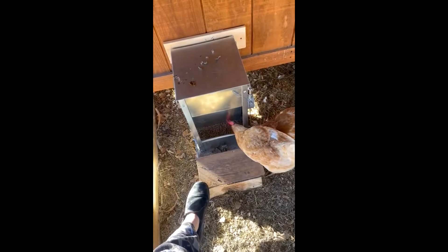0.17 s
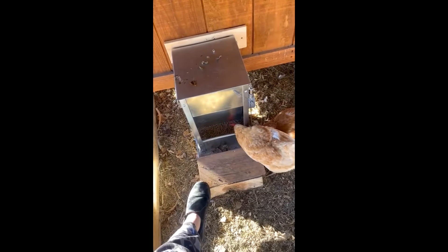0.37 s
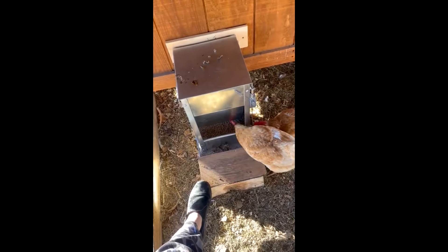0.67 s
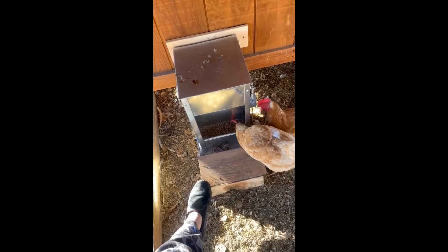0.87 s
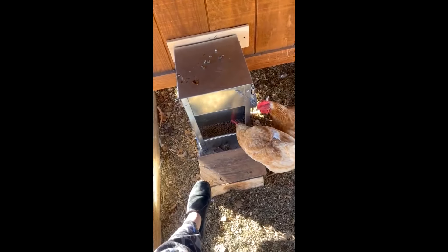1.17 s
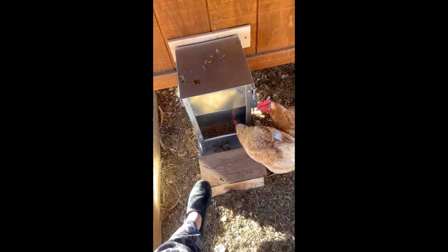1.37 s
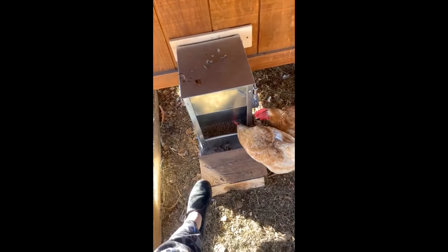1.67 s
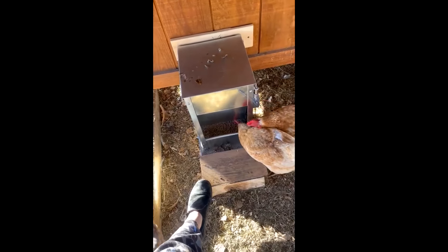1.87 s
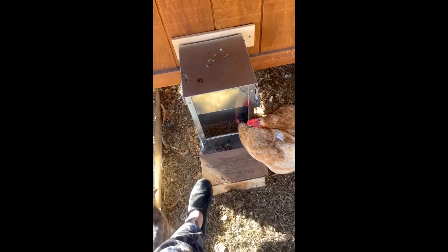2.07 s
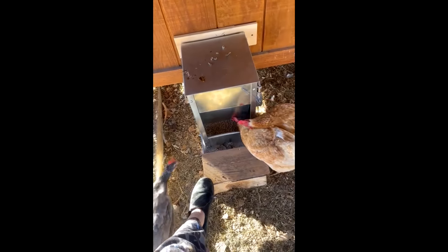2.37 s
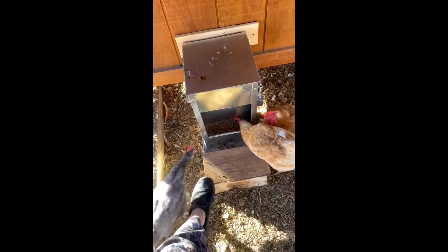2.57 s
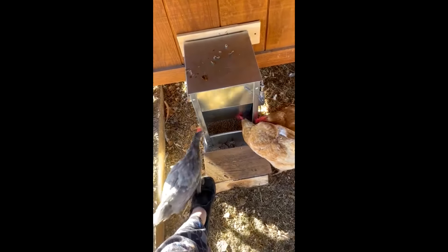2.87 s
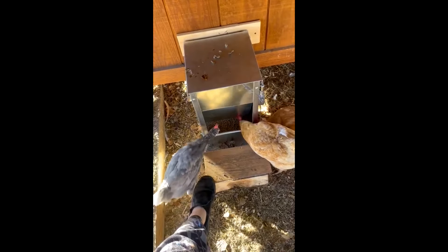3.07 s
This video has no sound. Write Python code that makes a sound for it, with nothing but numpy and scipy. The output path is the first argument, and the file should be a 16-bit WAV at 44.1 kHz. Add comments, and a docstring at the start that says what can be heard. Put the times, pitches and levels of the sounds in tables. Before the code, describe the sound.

Hens peck a metal feeder with sharp bright ticks, raking dry feed and clucking softly

```python
"""Hens at a metal feeder

Beaks tick on grain and metal (short pings over noise clicks) and rake through dry feed (dense random grains).
Hens cluck softly (harmonics through a throat resonance, with breath and low noise for body); one whines (a sine).
Feed and litter rustle and the flock murmurs over a low rumble with soft knocks (coloured noise on level curves).
A phone hears it in stereo: two microphone ports with a phase difference and short yard reflections.
"""
import sys
import numpy as np
from scipy import signal
from scipy.fft import rfft, irfft
from scipy.io import wavfile
from scipy.ndimage import uniform_filter1d

SR = 44100
rng = np.random.default_rng(int(sys.argv[2]) if len(sys.argv) > 2 else 0)


def to_wav(sig):
    """Store sig (one row per channel, or 1-D mono) as 16-bit WAV at the path in sys.argv[1].

    Samples outside -1..1 are clipped; the rate is SR.
    """
    pcm = np.clip(np.atleast_2d(sig), -1, 1) * 32767
    pcm = np.round(pcm).astype(np.int16)
    wavfile.write(sys.argv[1], SR, pcm.T)  # frames by channels


N = 141120  # length [samples]


def undb(db):
    """Gain of a level in dB."""
    return 10 ** (np.asarray(db, float) / 20)


def unit(x):
    """Scale to rms 1."""
    return x / np.sqrt(np.mean(x ** 2))


def curve(table, column=1):
    """A table column joined by straight lines in time."""
    points = np.array(table, float)
    return np.interp(np.arange(N) / SR, points[:, 0], points[:, column])


def bins():
    """Frequencies of the full-length spectrum [Hz]."""
    return np.arange(N // 2 + 1) * SR / N


def colour(x, table):
    """Filter by (frequency, level) points joined over log frequency, dark outside them; rms 1."""
    hz, db = np.array(table, float).T
    log_f = np.log(bins() + 1)  # 1 Hz up, to avoid log(0)
    gain = undb(np.interp(log_f, np.log(hz), db, left=-90, right=-90))
    return unit(irfft(rfft(x) * gain, N))


def band(x, lo_hz, hi_hz):
    """Causal band-pass."""
    sos = signal.butter(2, [lo_hz, min(hi_hz, SR * .45)], "band", fs=SR, output="sos")
    return signal.sosfilt(sos, x)


def walk(rate, size=N):
    """Smooth chance with rms 1: noise averaged twice over 1/rate seconds."""
    k = max(int(SR / rate), 1)
    noise = rng.standard_normal(size + 4 * k)
    smooth = uniform_filter1d(uniform_filter1d(noise, k), k)
    return unit(smooth[2 * k:2 * k + size])


def add(out, start, x):
    """Mix x into out at a time."""
    i = int(start * SR)
    out[i:i + len(x)] += x[:len(out) - i]


def patchy(x, edges_hz, rate, depth_db):
    """Let each band swell and sink on its own."""
    spec, f = rfft(x), bins()
    total = 0
    for lo, hi in zip(edges_hz, edges_hz[1:]):
        part = irfft(spec * ((f >= lo) & (f < hi)), N)
        total = total + part * undb(depth_db * walk(rate))
    return total


# Low rumble with soft low knocks at its peaks: (time [s], level [dB])
RUMBLE_LEVEL = [(0, -60.5), (.25, -52.5), (.45, -58.5), (1.04, -51.5), (1.15, -56), (1.32, -50), (1.5, -57),
                (1.8, -54.5), (2.05, -59), (2.16, -53.5), (2.58, -55), (2.75, -58.5), (2.95, -49.5),
                (3.05, -54.5), (3.2, -58.5)]
# Spectrum of the rumble: (frequency [Hz], relative level [dB per Hz])
RUMBLE_SPECTRUM = [(13, -45), (22, -21), (54, 1.5), (69, 0.5), (140, -6.5), (194, -18), (250, -19.5),
                   (320, -49), (550, -120)]


def rumble():
    """Low rumble: coloured noise with a slow waver; the peaks of its level curve are soft low knocks."""
    noise = colour(rng.standard_normal((3, N)), RUMBLE_SPECTRUM)
    return noise * undb(curve(RUMBLE_LEVEL) + 1.5 * walk(9))


# Murmur of the flock: (time [s], level [dB])
FLOCK_LEVEL = [(0, -61), (.4, -66.5), (.75, -67), (.95, -54), (1.5, -63.5), (1.65, -54.5), (1.71, -60),
               (1.8, -57), (2.05, -67), (2.3, -58), (2.65, -64), (3.2, -65)]
# Spectrum of the murmur: (frequency [Hz], relative level [dB per Hz])
FLOCK_SPECTRUM = [(100, -32), (170, 0), (248, -16.5), (330, -4.5), (446, -16), (780, -4), (1100, -8),
                  (1700, -23), (2210, -25), (3740, -120)]


def flock():
    """Murmur and shuffle of the flock: coloured noise that flickers band by band."""
    noise = colour(rng.standard_normal((3, N)), FLOCK_SPECTRUM)
    flicker = patchy(noise, [0, 280, 450, 700, 1100, SR], 14, 3.0)
    return flicker * undb(curve(FLOCK_LEVEL))


GRAINS_PER_S, GRAIN_SPREAD_DB, BIGGEST_GRAIN_DB = 5000, 3, 5.5
GRAIN_EDGES_HZ = [0, 2000, 2700, 3500, 4300, 5100, 5900, 6800, 7600, 8500, 9300, 10100, SR]


def grains():
    """Dense clicks of very uneven size: one stream heard by both ports, one more for each."""
    chance, size = rng.random((2, 3, N))
    hits = chance < GRAINS_PER_S / SR
    size_db = np.minimum(-GRAIN_SPREAD_DB * np.log(1 - size), BIGGEST_GRAIN_DB)
    return hits * undb(size_db) * rng.standard_normal((3, N))


# Level of the feed and litter rustle: (time [s], level [dB])
RUSTLE_LEVEL = [(0, -62), (.4, -60), (.81, -56), (1.15, -64), (1.75, -63.5), (2.3, -59), (2.85, -62.5),
                (2.96, -65.5), (3.2, -59)]
# Spectrum of the litter: (frequency [Hz], relative level [dB per Hz])
LITTER_SPECTRUM = [(1000, -1.5), (1400, -9.5), (2520, -6.5), (5460, 0), (7100, -11), (9320, -1),
                   (10700, -12.5), (11400, -36)]


def rustle():
    """Feed and litter never quite rest: coloured grains flicker band by band along a level curve."""
    litter = patchy(colour(grains(), LITTER_SPECTRUM), GRAIN_EDGES_HZ, 18.3, 3.6)
    return litter * undb(curve(RUSTLE_LEVEL) + 1.54 * walk(28.4))


BODY_S = 0.056  # time scale; the peak comes at a third of it
# Low, dull noise bodies, mostly under the clucks: (time [s], level [dB], pitch [Hz])
CLUCK_BODIES = [(1.05, -55, 209), (1.25, -53, 233), (1.409, -55, 210), (1.576, -51.5, 269),
                (1.639, -66, 254), (1.75, -54, 400), (1.85, -61, 605), (1.928, -60, 330)]


def cluck_bodies():
    """Low noise gives the clucks body: dull lumps, quick to start and slow to die."""
    out = np.zeros(N)
    u = np.arange(int(3 * BODY_S * SR)) / SR / BODY_S
    env = 8 * u * np.exp(-3 * u)  # peaks near 1
    for start, db, hz in CLUCK_BODIES:
        lump = unit(band(rng.standard_normal(len(u)), 0.45 * hz, 1.54 * hz))
        add(out, start, undb(db) * lump * env)
    return out


# Thin rising whine: (time [s], pitch [Hz], level [dB])
WHINE_GLIDE = [(1.8, 864, -85), (1.86, 915, -71), (2.03, 1066, -59), (2.09, 1117, -70), (2.11, 1120, -89)]


def whine():
    """One hen's thin whine: a sine gliding upward with a wavering level."""
    level = np.sqrt(2) * undb(curve(WHINE_GLIDE, column=2) + 2.0 * walk(36))  # sqrt(2): rms level
    return level * np.sin(2 * np.pi * np.cumsum(curve(WHINE_GLIDE)) / SR)


THROAT_WIDTH = .17  # resonance width in log frequency, narrower above the peak
CLUCK_ATTACK, SAG = 0.38, 0.024  # share of the cluck spent rising; share of the pitch lost along it
CHEST_DB, SKIRT_DB, BREATH_DB = -16, -18.5, 1  # extra fundamental, floor of the overtones, breath
RASP_HZ = 100.5  # rate of the roughness
# Clucks: (time [s], length [s], level [dB], pitch [Hz], throat resonance [Hz], roughness [0-1, clipped])
CLUCK_CALLS = [(0.684, 0.029, -44.5, 288.5, 768, 0.1), (0.826, 0.044, -49, 301.3, 1000, 0.42),
               (0.92, 0.096, -55, 331, 945, 0.58), (1.177, 0.03, -51, 338, 1010, 0.3),
               (1.167, 0.041, -50.5, 281, 850, 0.42), (1.207, 0.018, -48, 285, 835, 0.1),
               (1.296, 0.0526, -51.5, 340, 1010, 0.49), (1.379, 0.059, -48.5, 345.2, 1000, 0.29),
               (1.414, 0.077, -58, 348, 357, 0.36), (1.573, 0.041, -43.5, 343, 944, 0.3),
               (1.605, 0.031, -48, 340.4, 1010, 0.4), (1.745, 0.055, -51, 394, 816, 0.48),
               (1.936, 0.041, -50, 376, 840, 0.42), (2.132, 0.078, -54.5, 369.7, 790, 0.65),
               (2.318, 0.037, -50.5, 277.6, 556, 0.97), (2.465, 0.071, -45.5, 335.6, 1010, 0.4),
               (2.505, 0.064, -43.5, 313, 610, 0.48), (3.015, 0.072, -42.5, 340, 1010, 0.43),
               (3.039, 0.046, -47.5, 238.3, 502, 1.03)]


def clucks():
    """A sagging harmonic voice through a throat resonance, rasping and breathy when rough."""
    out = np.zeros(N)
    k = np.arange(1, 7)[:, None]  # harmonic numbers
    for start, length, db, hz, throat_hz, rough in CLUCK_CALLS:
        n = int(length * SR)
        u, rough = np.arange(n) / n, np.clip(rough, 0, 1)
        pitch = hz * (1 - SAG * (u - .5) + 0.028 * rough * walk(RASP_HZ, size=n))
        off = np.log(k * hz / throat_hz) / THROAT_WIDTH
        throat = np.exp(-(off * np.where(off > 0, 1.5, 1)) ** 2 / 2)
        chest = 2 * rough * undb(CHEST_DB) * (k == 1)
        skirt = undb(SKIRT_DB) * (k > 1) * (k * hz < 1600)
        rasp = 1 - rough + rough * np.array([walk(RASP_HZ, size=n) for _ in k])
        tones = np.sin(k * 2 * np.pi * np.cumsum(pitch) / SR)
        voice = unit(((throat + chest + skirt) * rasp * tones).sum(axis=0))
        lo_hz, hi_hz = 0.59 * throat_hz, 1.37 * throat_hz
        breath = unit(band(band(rng.standard_normal(n), lo_hz, hi_hz), lo_hz, hi_hz))
        env = np.sin(np.pi / 2 * np.minimum(u / CLUCK_ATTACK, (1 - u) / (1 - CLUCK_ATTACK)))
        body = unit(voice + rough ** 2 * undb(BREATH_DB) * breath)
        add(out, start, undb(db) * np.sqrt(2) * env * body)
    return out


RAKE_ATTACK_S, RAKE_RELEASE_S = .012, 0.03  # ramp and fade scales, before the envelope is sharpened
DIG_DB, DIG_S = -1, 0.0039  # brief level dip around the start of each rake
CRUNCH_DB = 3  # rms of the level flicker
SPLIT_HZ = 6660  # between the middle and top bands
# Beak rakes: (time [s], length before the fade [s], level midway between bands [dB], top over middle [dB])
RAKE_STROKES = [(0.15, 0.032, -40.5, -8.5), (0.214, 0.074, -46.5, -12), (0.51, 0.024, -51.5, 15),
                (0.646, 0.016, -50.5, -4), (0.813, 0.032, -45.5, -6.5), (0.877, 0.084, -55, -20.5),
                (0.972, 0.036, -55.5, -30), (1.273, 0.024, -56.5, -18), (1.328, 0.074, -59, -6),
                (1.407, 0.073, -37, -4.5), (2.045, 0.028, -52.5, -6), (2.095, 0.1, -40, -7),
                (2.343, 0.02, -59, -24), (2.41, 0.012, -48.5, 0), (2.447, 0.1, -42, -8.5),
                (2.764, 0.057, -55.5, -12), (2.836, 0.071, -52, -5.5), (2.994, 0.049, -55.5, -11)]
# Spectrum of feed on metal: (frequency [Hz], relative level [dB per Hz])
FEED_SPECTRUM = [(300, -23.5), (787, -8), (2230, -15.5), (4150, -4), (5600, -2.5), (7180, -2), (9200, 4),
                 (10800, -1.5), (11600, -65.5)]


def rakes():
    """Each rake sets grains sliding on metal; middle and top bands have their own level and crunch."""
    slide = patchy(colour(grains(), FEED_SPECTRUM), GRAIN_EDGES_HZ, 39, 2.85)
    middle = irfft(rfft(slide) / (1 + (bins() / SPLIT_HZ) ** 12), N)
    top = slide - middle
    t = np.arange(N) / SR
    env = np.zeros((2, N))  # middle, top
    for start, length, db, top_db in RAKE_STROKES:
        u = t - start
        rise = np.clip(u / RAKE_ATTACK_S + 0.26, 0, 1)  # begins just ahead of the start time
        fade = np.exp(-2 * np.maximum(u - length, 0) / RAKE_RELEASE_S)
        dig = undb(DIG_DB * np.exp(-np.abs(u) / DIG_S))
        env += (rise * fade) ** 1.24 * dig * undb([[db - top_db / 2], [db + top_db / 2]])
    middle_crunch = undb(CRUNCH_DB * walk(90.0))
    top_crunch = undb(CRUNCH_DB * walk(128))
    return env[0] * middle * middle_crunch + env[1] * top * top_crunch


TICK_HZ, TICK_T60_S = 9260, 0.0064  # mean ping pitch; decay by 60 dB
TICK_BROAD_DB, TICK_TAIL_DB = -14, -14  # broad click and settling grains, against the ping
TICK_TRIM_DB = 5  # added to every tick
# Single beak ticks: (time [s], level before the trim [dB])
TICK_HITS = [(0.164, -29), (0.1701, -23), (0.1726, -25), (0.1726, -25), (.1760, -33), (.5188, -40),
             (.5220, -33), (.8884, -41), (1.3516, -53), (1.4152, -34), (1.421, -35), (2.0717, -41),
             (2.108, -25), (2.1105, -25), (2.4174, -35.5), (2.4626, -21), (2.4665, -22), (2.4662, -26),
             (2.8562, -47), (3.0004, -49.5)]


def ticks():
    """A beak tip: a millisecond ping over a broad click, then a noise tail as a few grains settle."""
    out, u = np.zeros(N), np.arange(1000) / SR
    decay = np.exp(-np.log(1000) * u / TICK_T60_S)
    click = undb(TICK_BROAD_DB) * decay + undb(TICK_TAIL_DB) * np.exp(-u / 0.0078)
    for start, db in TICK_HITS:
        hz = TICK_HZ * (1 + .03 * rng.standard_normal())
        ring = np.sin(2 * np.pi * hz * u) * decay * np.minimum(u / .0003, 1)
        wide = band(rng.standard_normal(len(u)), 4300, 8900)
        add(out, start, undb(db + TICK_TRIM_DB) * (ring + click * wide))
    return out


YARD_DB, YARD_T60_S = -15, .08  # reflections against the direct sound; decay by 60 dB


def yard_reflections():
    """Short reflections: a decaying noise response of its own for each port."""
    u = np.arange(int(.2 * SR)) / SR
    tail = rng.standard_normal((2, len(u))) * np.exp(-np.log(1000) * u / YARD_T60_S)
    tail = undb(YARD_DB) * tail / np.sqrt((tail ** 2).sum(axis=1, keepdims=True))
    return rfft(tail, N)


LEFT_DIP_HZ, LEFT_DIP_DB = 390, -5  # the left port is shaded in the low middle
# Phase lead of the left microphone port over the right: (frequency [Hz], phase [rad])
PORT_PHASE = [(170, .27), (340, -.8), (470, -.4), (570, 3.0), (750, 2.7), (850, 1.7), (1100, 1.7),
              (2070, 0.8), (2930, 1.5), (4310, 2.24), (5340, 6.5), (6500, 8.5), (8600, 10.5), (10200, 10.8)]


def ports():
    """Response of the two ports: the phase lead is shared half and half, with a dip on the left."""
    f = bins()
    lead = np.interp(f, *np.array(PORT_PHASE).T, left=0)
    turn = np.exp(.5j * lead * np.array([[1], [-1]]))
    turn[0] *= undb(LEFT_DIP_DB / (1 + (f / LEFT_DIP_HZ - 1) ** 2 / 0.077))
    return turn


BASS_DIFFUSE, DIFFUSE, DIFFUSE_HZ = 0.03, 0.64, 270  # separate share in the bass, added above, corner


def scene():
    """Near sounds reach both ports and reflect; spread sounds grow more separate above the bass."""
    near = rfft(ticks() + clucks() + whine() + cluck_bodies())
    spread = rfft(rakes() + rustle() + flock() + rumble())  # shared stream, then one for each port
    f, turn = bins(), ports()
    share = BASS_DIFFUSE + DIFFUSE * f ** 2 / (f ** 2 + DIFFUSE_HZ ** 2)
    near_ports = near * (turn + yard_reflections())
    spread_ports = np.sqrt(1 - share ** 2) * turn * spread[0] + share * spread[1:]
    return irfft(near_ports + spread_ports, N)


TOP_HZ = 11900


def record(dry):
    """The phone cuts the top with a steep low-pass."""
    return signal.sosfilt(signal.ellip(8, .2, 70, TOP_HZ, fs=SR, output="sos"), dry)


dry = scene()
out = record(dry)
to_wav(out)
```